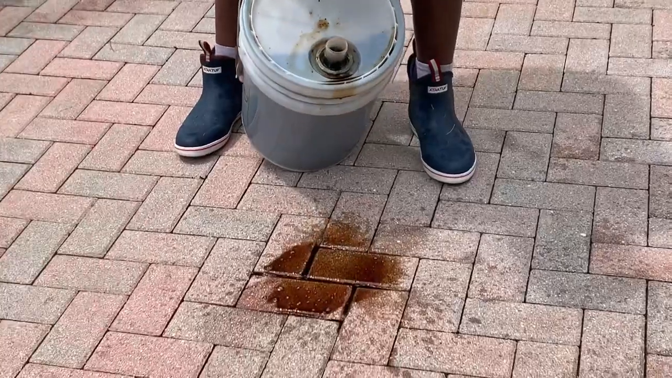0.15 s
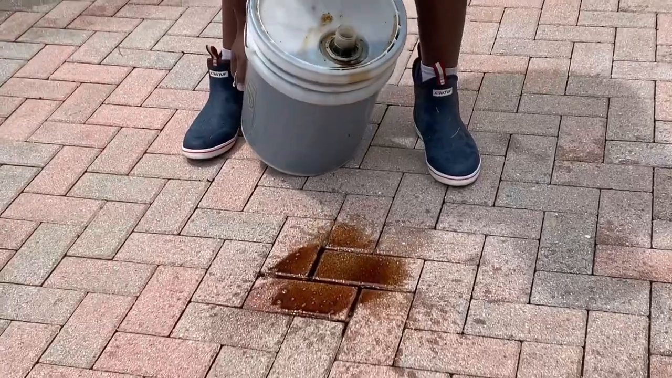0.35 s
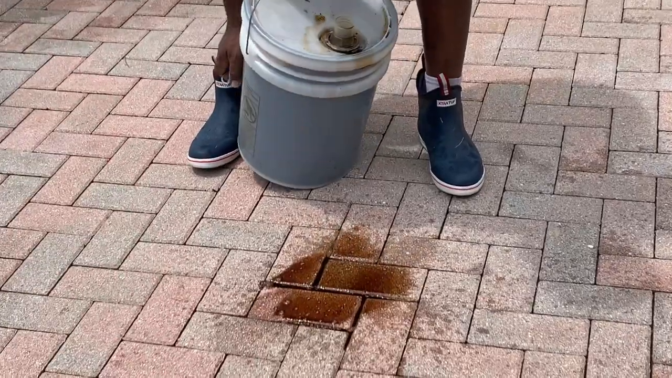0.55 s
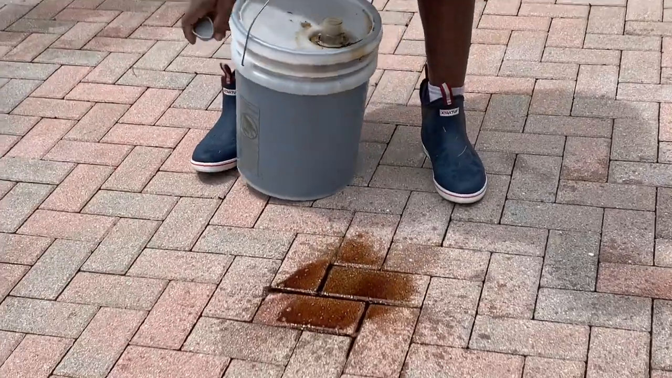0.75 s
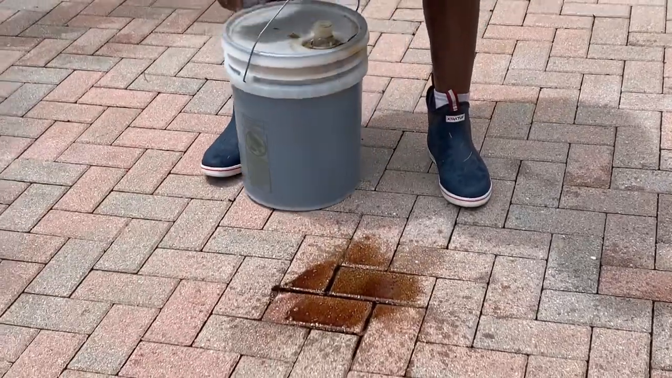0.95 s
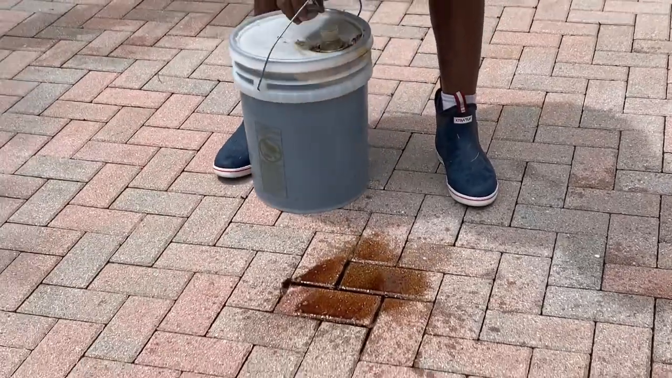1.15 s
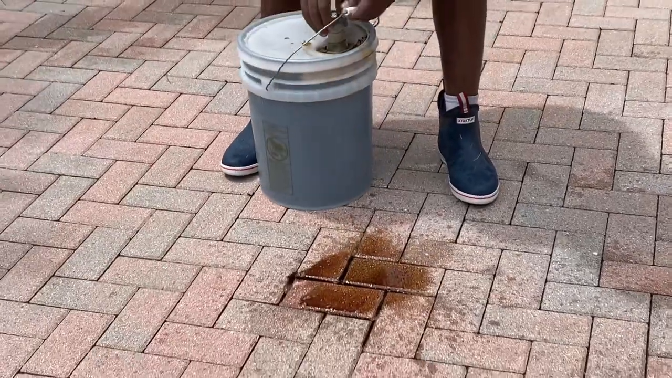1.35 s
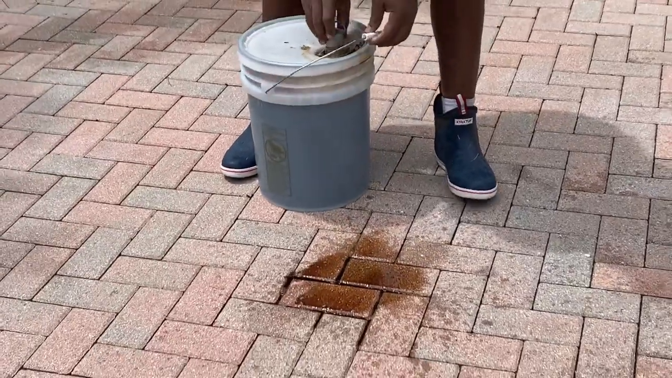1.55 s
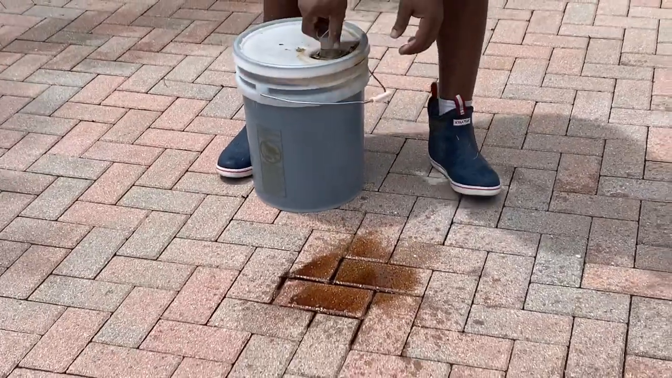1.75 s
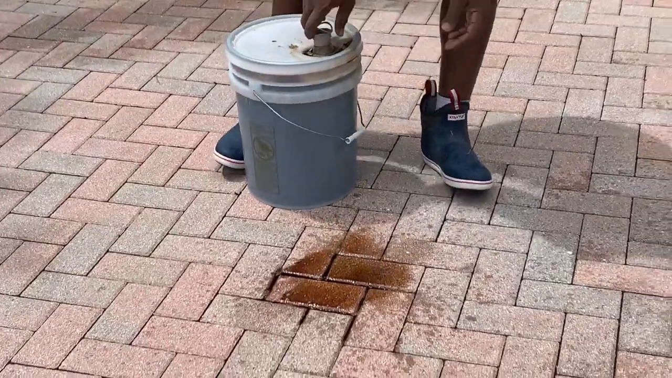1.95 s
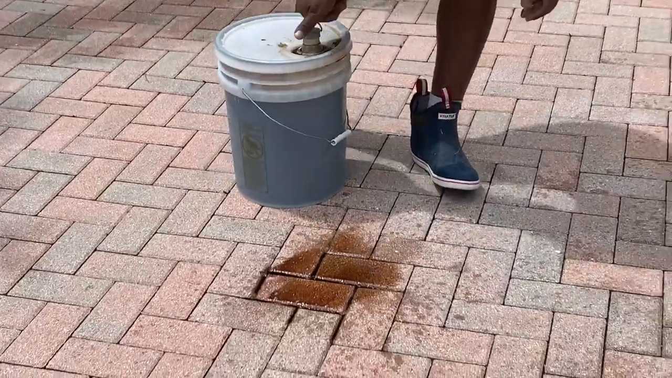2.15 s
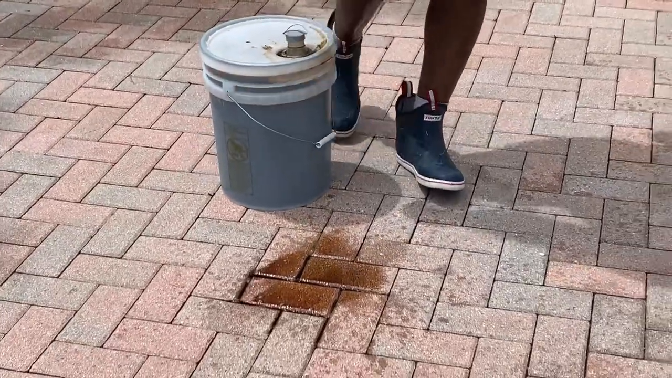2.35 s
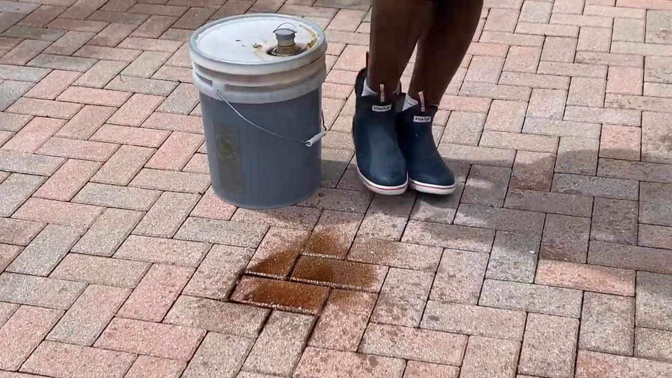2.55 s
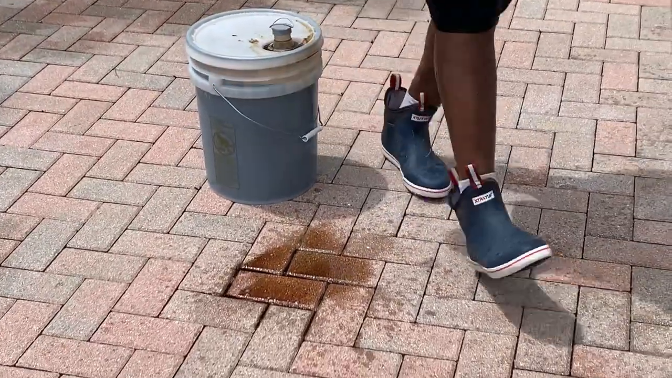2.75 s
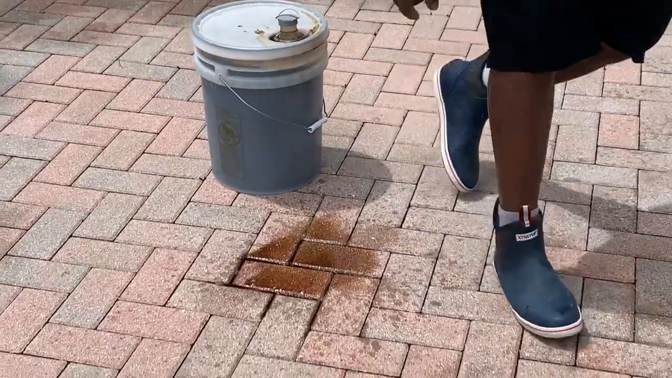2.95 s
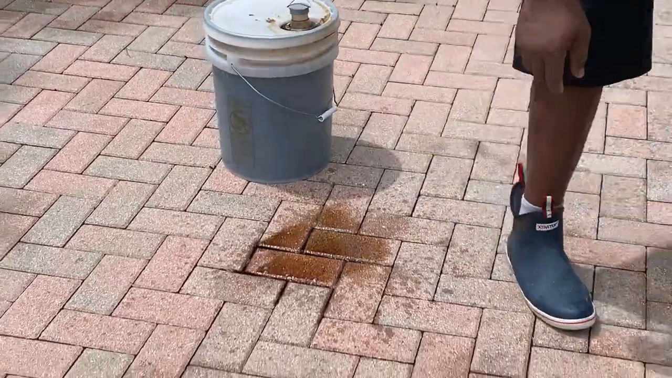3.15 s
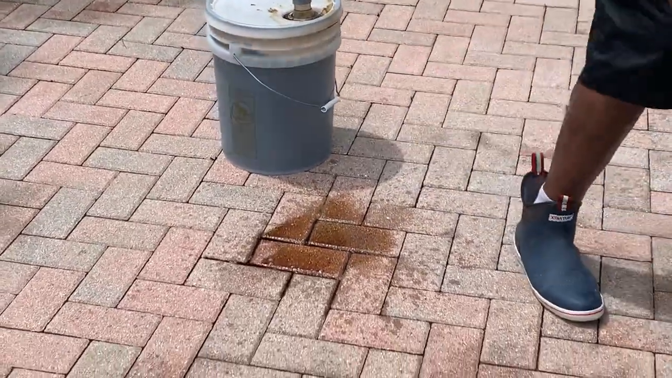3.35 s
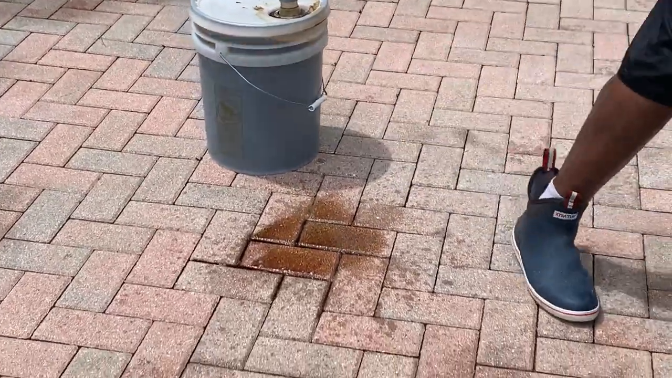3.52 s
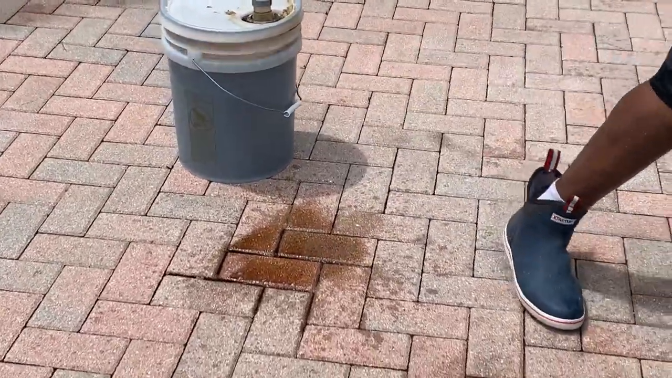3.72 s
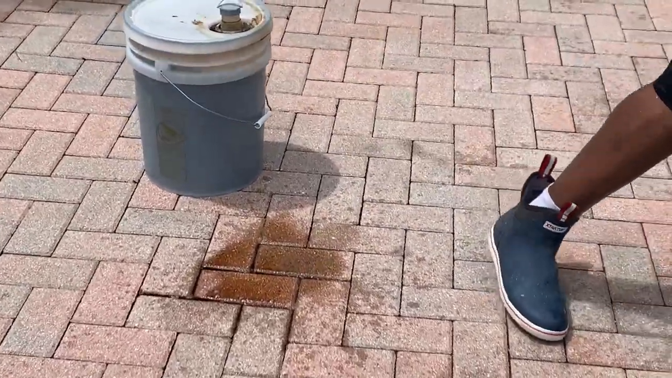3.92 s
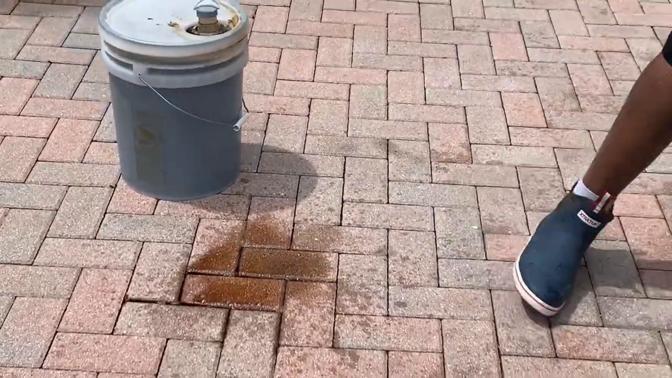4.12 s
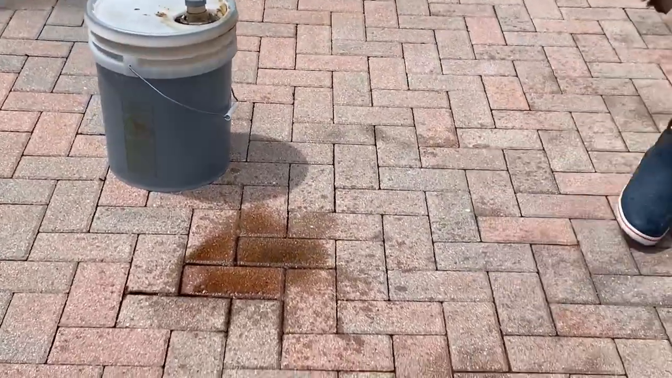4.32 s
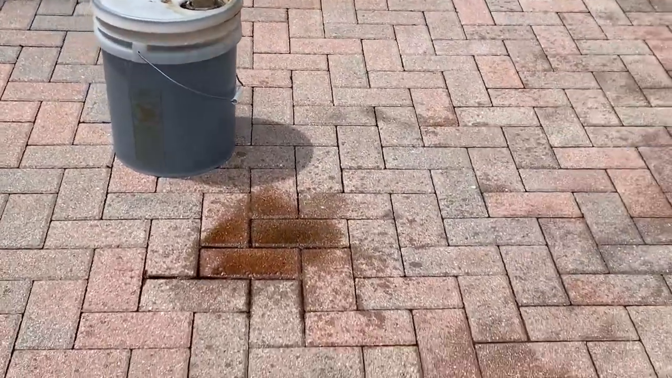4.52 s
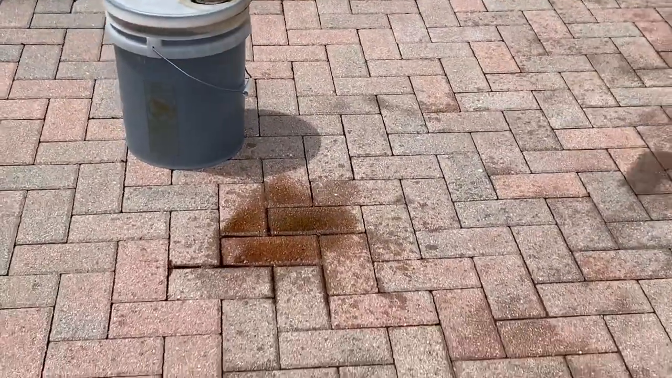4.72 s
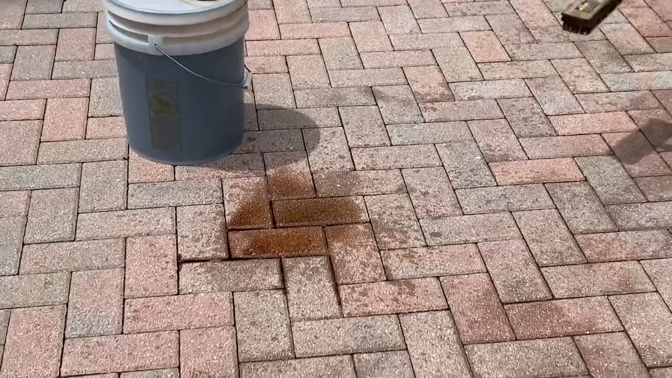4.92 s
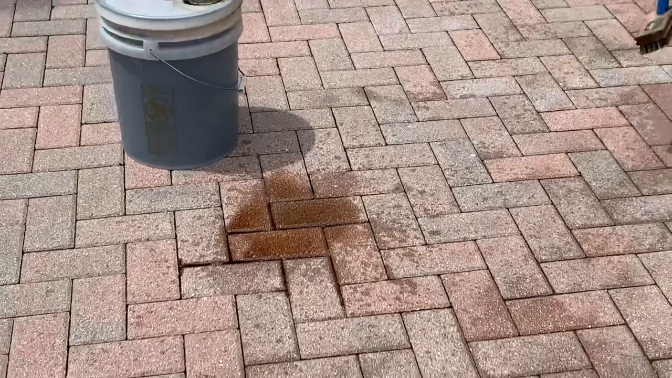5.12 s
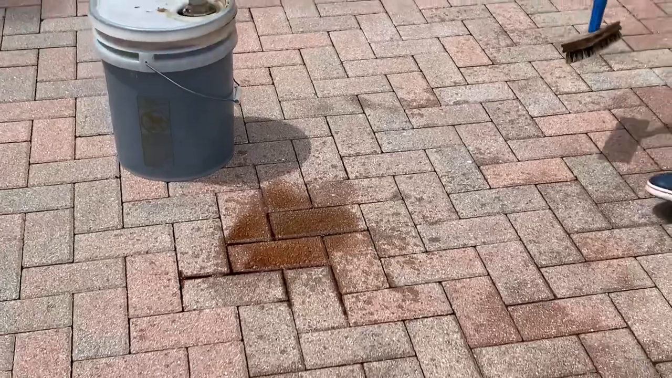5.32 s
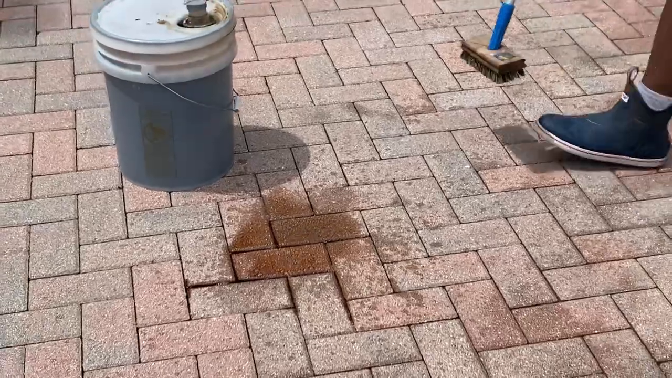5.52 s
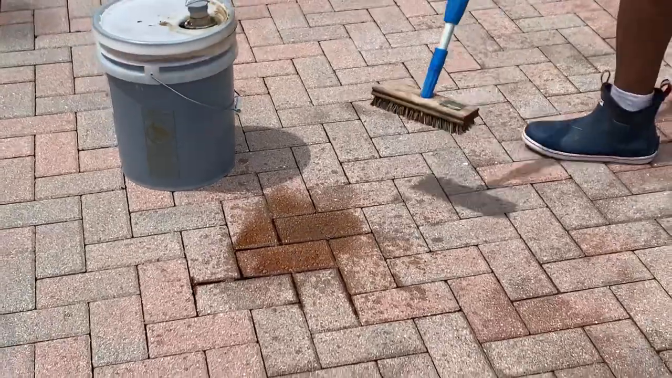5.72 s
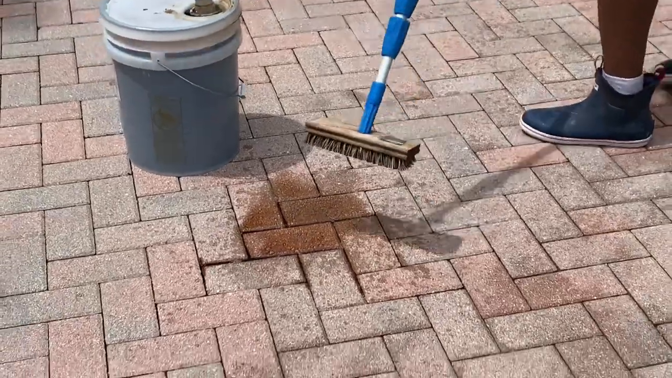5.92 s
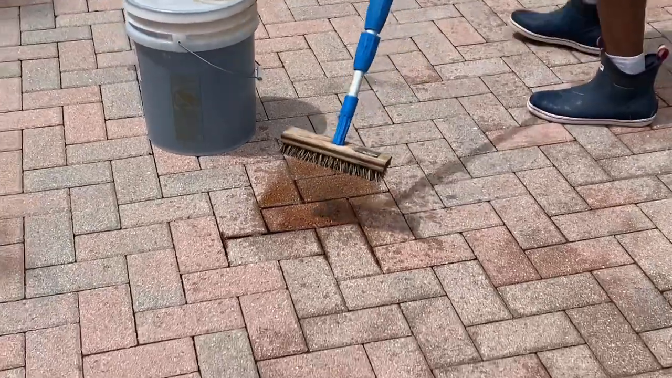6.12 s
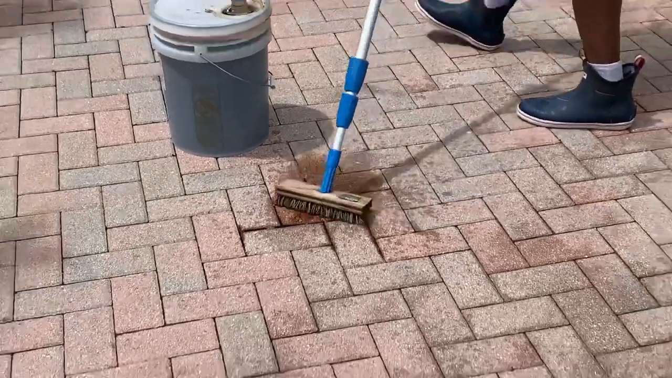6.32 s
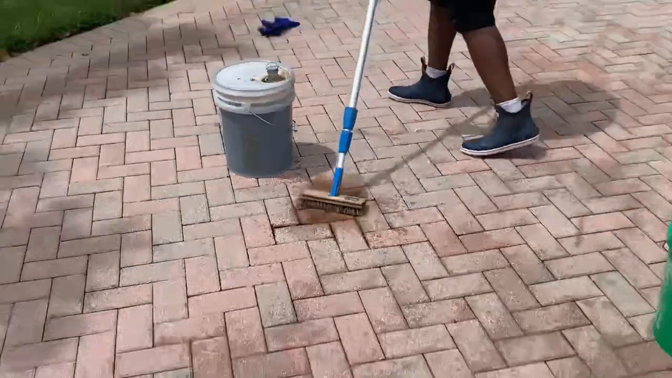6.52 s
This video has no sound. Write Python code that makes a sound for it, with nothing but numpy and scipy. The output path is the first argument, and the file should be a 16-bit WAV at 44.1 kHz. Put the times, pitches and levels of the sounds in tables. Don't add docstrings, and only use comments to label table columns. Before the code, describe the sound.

A full plastic pail thuds onto brick pavers, its wire handle clatters down, boots scuff away, then a stiff brush scrubs briefly outdoors.

```python
import sys
import numpy as np
from scipy import signal
from scipy.fft import rfft, irfft
from scipy.io import wavfile
from scipy.ndimage import uniform_filter1d

SR = 44100
rng = np.random.default_rng(int(sys.argv[2]) if len(sys.argv) > 2 else 0)


def invert_db(x):
    u = np.asarray(x, float) / 20
    return 10 ** u


def wav_record(signal):
    frames = np.transpose(np.atleast_2d(signal))
    bounded = np.clip(frames, -1, 1)
    quanta = np.round(bounded * 32767).astype(np.int16)
    wavfile.write(sys.argv[1], SR, quanta)


N = 294147
T = np.arange(N) / SR
HZ = np.fft.rfftfreq(N, 1 / SR)


def rms_one(x):
    return x / np.sqrt(np.mean(x ** 2) + 1e-20)


def in_time(rows):
    s, *columns = np.transpose(rows)
    return [np.interp(T, s, column) for column in columns]


def at_hz(points):
    hz, value = np.transpose(points)
    return np.interp(np.log(HZ + 1), np.log(hz), value)


def drift(rate_hz):
    steps = rng.standard_normal(int(N / SR * 60) + 9)
    memory = np.exp(-2 * np.pi * rate_hz / 60)
    slow = rms_one(signal.lfilter([1], [1, -memory], steps))
    return np.interp(T * 60, np.arange(len(steps)), slow)


def grains(per_s, spread_db):
    happens = rng.random(N) < per_s / SR
    sizes = invert_db(spread_db * np.minimum(rng.exponential(1, N), 4)) * happens
    return rms_one(sizes * rng.standard_normal((2, N)))


def swells(rows, rise):
    edge_db = 24.5
    coarse, rise = T[::32], np.clip(rise, .01, .9)
    s, length, *peaks = np.transpose(rows)[..., None]
    away = np.maximum((s - coarse) / rise, (coarse - s) / (1 - rise)) / length
    return np.array([np.interp(T, coarse, invert_db(2 * (peak_db - edge_db * away)).sum(axis=0)) for peak_db in peaks])


def resonate(x, peaks):
    out = 0
    for k, (hz, width_hz, level_db) in enumerate(peaks):
        r = np.exp(-np.pi * width_hz / SR)
        poles = [1, -2 * r * np.cos(2 * np.pi * hz / SR), r * r]
        out = out + (-1) ** k * invert_db(level_db) * signal.lfilter([1 - r, 0, r - 1], poles, x)
    return out


def patchy(pair, window, across, along, spread_db):
    _, _, cells = signal.stft(pair, nperseg=window)
    chance = rng.standard_normal(cells.shape[1:])
    patches = uniform_filter1d(uniform_filter1d(chance, size=across, axis=0), size=along, axis=1)
    return rms_one(signal.istft(cells * invert_db(spread_db * rms_one(patches)), nperseg=window)[1][:, :N])


# f/Hz, likeness (0 to 1)
FAR = [(100, 0.84), (400, 0.54), (900, 0.47), (1500, 0.3), (2100, 0.21), (3400, 0.33), (4200, 0.4),
       (5800, 0.22), (6400, 0.31), (7500, 0.79), (8300, 0.78), (16000, 1)]
# f/Hz, likeness (0 to 1)
NEAR = [(400, 0.83), (1300, 0.74), (2200, 0.26), (3400, 0.13), (4200, 0.79), (5500, 0.53), (6500, 0.84),
        (7500, 0.85), (8300, 0.91), (16000, .93)]


def colour(pair, spectrum, likeness):
    shared, own = rfft(pair) * invert_db(at_hz(spectrum))
    alike = np.clip(at_hz(likeness), 0, 1)
    shared, own = shared * np.sqrt(1 + alike), own * np.sqrt(1 - alike)
    return irfft(np.array([shared + own, shared - own]), N)


# f/Hz, level/dB per Hz
AIR = [(30, -14), (60, 5.5), (120, 1), (250, -5), (400, -14), (800, -16), (1400, -19), (2500, -25),
       (4000, -32), (6000, -36.5), (7800, -44.5), (8800, -33.5), (12000, -73), (16000, -65)]
# t/s, level/dB
AIR_LEVEL = [(0.0, -55), (1.88, -55), (2.53, -57), (5.78, -53.5), (6.09, -55.5), (6.67, -49)]


def air():
    hush = colour(rng.standard_normal((2, N)), AIR, FAR)
    return invert_db(11 + in_time(AIR_LEVEL)[0]) * patchy(hush, 512, 5, 24, 2.27)


# t/s, firing f/Hz, level/dB, extra path of the wall echo/m, boom of the exhaust pipe/dB
ENGINE = [(0.0, 52.87, -42.0, 2.65, -4), (0.83, 52.6, -41.5, 2.29, -5.5), (1.11, 52.34, -44.5, 2.8, 1),
          (1.28, 52.53, -46, 2.57, 0.5), (1.79, 52.48, -44, 2.64, -0.5), (1.88, 51.97, -44, 2.38, -3.5),
          (2.5, 52.1, -42, 2.33, -3), (2.88, 52.65, -44, 2.42, 5), (3.08, 53.1, -46.5, 3.04, 4),
          (3.7, 53.38, -45.5, 2.5, 4), (3.98, 53.32, -45, 2.62, -1.5), (4.5, 53.18, -40, 2.78, -7.5),
          (4.63, 53.52, -38.5, 2.45, -2), (5.02, 53.56, -38.5, 2.56, -8), (5.59, 53.36, -46, 2.5, 0.1),
          (5.78, 52.94, -54.5, 2.9, 2.5), (6.16, 52.26, -46, 2.9, 0.3), (6.64, 52.28, -51.5, 3.46, -1)]
# multiple of firing rate, level/dB, share of the boom
STRONG = [(2, 0.13, -0.12), (3, -8.5, -0.18), (4, -6.5, 1.17), (5, -19.5, -0.042), (6, -12.5, -0.14),
          (6.5, -22.5, -.6)]
# multiple of firing rate, level/dB
UNEVEN = [(1.5, -62), (2.5, -52.5), (3.5, -55.5), (4.5, -62.5), (5.5, -64.5), (7, -71.5), (8, -75)]


def engine():
    echo, sound_m_per_s = 1.094, 346.5
    hz, level, echo_m, boom_db = in_time(ENGINE)
    turn = 2 * np.pi * np.cumsum(hz) / SR
    late = 2 * np.pi * hz * uniform_filter1d(echo_m, size=4000) / sound_m_per_s
    lines = []
    for k, db, share in STRONG:
        comb_db = 10 * np.log10(1 + echo ** 2 + 2 * echo * np.cos(k * late) + 1e-9)
        lines.append((k, level + db + share * boom_db + comb_db))
    lines += [(k, level_db + 4.2 * drift(0.45)) for k, level_db in UNEVEN]
    out = 0
    for k, level_db in lines:
        phase = k * turn + rng.uniform(0, 2 * np.pi) + 0.035 * drift(10.0)
        line = np.sqrt(2) * invert_db(level_db + 0.57 * drift(2.3)) * np.exp(1j * phase)
        out = out + np.cos(0.038 * k) * line.imag + np.sin(0.039 * k) * line.real * [[1], [-1]]
    return out


# f/Hz, level/dB per Hz
WIND_COLOUR = [(25, -65), (40, 2), (62, 9.5), (90, 11), (140, 5.5), (220, -17), (350, -13), (600, -48.5)]
# t/s, level/dB
BREEZE = [(0.0, -59), (2.3, -64), (2.8, -59), (3.9, -44.5), (5.3, -38.5), (6.67, -41)]
# t/s, length/s, peak level/dB
GUSTS = [(.12, .3, -45), (.34, .4, -50), (1.06, .2, -32.5), (1.4, 0.25, -43), (1.84, 0.45, -41),
         (2.25, 0.2, -39.5), (3.05, 0.28, -36), (3.35, 0.32, -37.5), (3.6, .3, -42), (3.78, 0.4, -36.5),
         (4.53, 0.41, -40), (4.68, 0.43, -31.5), (4.95, 0.42, -39), (5.2, 0.45, -33), (5.54, 0.28, -32),
         (6.16, .3, -33.5), (6.43, 0.34, -41)]


def wind():
    noise = invert_db(7.7 * drift(22)) * rng.standard_normal((2, N))
    lumps = colour(noise, WIND_COLOUR, [(50, 0.75), (300, 0.86)])
    strength = np.sqrt(uniform_filter1d(np.mean(lumps ** 2, axis=0), size=4000) + 1e-20)
    power = invert_db(2 * in_time(BREEZE)[0]) + swells(GUSTS, 0.49)[0]
    return np.sqrt(power) * lumps / strength


# t/s, peak level/dB
KNOCKS = [
    (0.215, -30.5),
    (3.313, -34),
    (3.392, -45),
    (3.4, -42),
    (3.556, -41),
    (3.62, -48.5),
    (5.418, -37.5),
    (6.032, -36.5),
    (6.071, -31),
    (6.134, -29),
]


def knocks():
    after = np.arange(3000) / SR
    hz = 55 + 1100 / (1 + after / 0.00178) ** 1.6
    fade = (1 - np.exp(-after / 0.0021)) * invert_db(-60 * after / 0.053)
    sweep = np.sin(2 * np.pi * np.cumsum(hz) / SR) * fade
    out = np.zeros((2, N))
    for s, peak_db in KNOCKS:
        at = round(s * SR)
        out[:, at:at + 3000] += invert_db(peak_db + 9.0) * sweep * invert_db([[1.5], [-1.5]])
    return out


# f/Hz, level/dB per Hz
GRIND = [(400, -3), (800, -4), (2200, 2.5), (4000, -7), (6000, -8.5), (8000, -16.5)]
# f/Hz, level/dB per Hz
HISS = [(4000, -19), (6500, -1), (7800, -6.5), (8800, 4), (11000, -1.5), (14000, -5), (16000, 3.5)]
# f/Hz, level/dB per Hz
SLIDE = [(2500, 2), (4500, 1.5), (7800, -6), (8800, -1), (11000, -7.5), (12500, -9), (13500, -22),
         (16000, -28)]
# t/s, length/s, grinding level/dB, hiss level/dB
RUBS = [(.72, 0.14, -60.5, -58), (.802, 0.16, -53.5, -53.5), (1.3, 2.8, -67, -85), (1.6, 0.26, -76, -72),
        (2.08, 1.26, -63.5, -60.5), (2.52, 0.27, -63, -55), (2.93, 0.57, -62.5, -59),
        (3.55, 0.68, -75, -66), (3.84, 0.28, -66, -60), (4.15, 0.26, -64, -58.5), (4.55, 0.27, -58.5, -61),
        (5.47, 0.16, -80, -64), (5.645, 0.46, -50.5, -52), (5.77, 0.28, -53.5, -59), (6.23, .2, -58, -73)]
# t/s, length/s, grinding level/dB, hiss level/dB
SCRAPES = [(.39, 0.7, -61.5, -79), (.994, 0.02, -55, -41), (1.004, .08, -55, -48.5),
           (1.04, 0.45, -60, -62.5), (1.722, 0.086, -58.5, -60.5), (1.82, 0.089, -37.5, -43),
           (3.38, 0.17, -78, -58), (4.425, .6, -69, -60.5), (5.056, 0.034, -49, -62), (5.07, .25, -73, -66),
           (5.518, 0.4, -60, -48), (5.985, 0.11, -72, -57), (6.283, 0.02, -51, -40)]


def scuffs():
    at_rest = invert_db([[2 * -69], [2 * -80]])
    grind_db, hiss_db = 10 * np.log10(swells(RUBS, 0.53) + swells(SCRAPES, 0.056) + at_rest)
    grind = rms_one(colour(grains(5000, 0.68), GRIND, FAR)) * invert_db(grind_db + 6.5)
    fine = grains(9000, 0.54)
    dragged = (T > 5.51) & (T < 5.75)
    hiss = np.where(dragged, rms_one(colour(fine, SLIDE, NEAR)), rms_one(colour(fine, HISS, NEAR)))
    return (grind + hiss * invert_db(hiss_db + 7.0)) * np.clip((6.3 - T) / 0.021, 0, 1)


# t/s, length/s, level/dB, start f/Hz, end f/Hz
SQUEAKS = [
    (.702, 0.028, -50.5, 1300, 1050),
    (.696, 0.04, -52.5, 3300, 3200),
    (1.042, .03, -49.5, 1020, 1230),
    (.78, .039, -49, 2700, 4200),
    (3.65, .009, -48, 2400, 2180),
    (4.112, 0.0358, -50, 1465, 1400),
    (4.139, .058, -50.5, 2400, 1600),
    (6.195, 0.054, -51, 950, 1300),
    (5.58, .15, -51, 2400, 2600),
    (1.045, .05, -55, 800, 600),
]
# t/s, length/s, level/dB, start f/Hz, end f/Hz
CHIRPS = [
    (5.075, .06, -66, 9000, 9050),
    (5.175, 0.04, -54.5, 9180, 9240),
    (5.347, 0.03606, -56, 9800, 10000),
]


def squeaks():
    out = np.zeros((2, N))
    events = [(*row, 0.36) for row in SQUEAKS] + [(*row, 0.024) for row in CHIRPS]
    for s, length, level_db, start_hz, end_hz, width in events:
        part = np.linspace(0, 1, round(length * SR))
        lowpass = signal.butter(2, width * start_hz / SR)
        rough = rms_one(signal.lfilter(*lowpass, rng.standard_normal((2, 12000)))[:, -len(part):])
        glide = np.cos(2 * np.pi * np.cumsum(start_hz + (end_hz - start_hz) * part) / SR)
        swell = invert_db(level_db) * np.sqrt(np.sin(np.pi * part))
        out[:, round(s * SR):][:, :len(part)] += swell * glide * rough * [[1], [.5]]
    return np.array([out[0] + out[1], out[0] - out[1]])


# t/s, peak level/dB, f/Hz, t60/s
THUMPS = [(0.999, -25, 194.6, 0.23), (1.0015, -23, 97, .2), (1.0118, -22, 96, 0.17),
          (1.044, -34.5, 286, 0.15), (1.078, -37.5, 288, 0.14), (1.087, -24, 107, .12), (1.05, -28, 71, .2),
          (.995, -46, 1030, .08), (1.012, -47, 980, .07), (.995, -35.5, 381, 0.11), (0.92, -39, 600, 0.1),
          (1.545, -53.5, 1250, 0.043), (4.2, -48, 480, 0.048), (2.06, -36.5, 210, 0.39),
          (3.501, -33, 553, 0.041), (1.82, -40, 294.1, 0.29), (1.9, -31.5, 191, 0.33),
          (2.149, -32, 243.8, 0.22), (4.649, -25.5, 59, 0.67), (5.436, -19.5, 66.5, 0.28),
          (5.508, -16.5, 67.7, 0.19), (5.515, -20, 163.6, 0.12)]


def thumps():
    out = np.zeros(N)
    after = T[:SR // 2]
    for s, peak_db, hz, t60 in THUMPS:
        envelope = invert_db(peak_db - 60 * after / t60) * (1 - np.exp(-after / 0.0043))
        out[round(s * SR):][:len(after)] += envelope * np.sin(2 * np.pi * hz * after)
    return out


# f/Hz, width/Hz, level/dB
PAIL = [(1144, 195, 11), (2020, 140, 9), (3500, 1000, -11), (5100, 800, -13)]
# f/Hz, width/Hz, level/dB
WIRE = [(6500, 850, -21), (8750, 240, 9), (12470, 1300, 0), (15200, 1200, -12)]
# f/Hz, width/Hz, level/dB
SOLE = [(663, 81, 12.5), (2400, 2700, -4.5)]
# f/Hz, width/Hz, level/dB
GRIT = [(1100, 330, 1.5), (2470, 900, 2.5)]
# f/Hz, width/Hz, level/dB
BLOCK = [(1500, 127, 7), (5300, 320, 7), (7025, 510, 5.5)]
# t/s, dull level/dB, bright level/dB, ring f/Hz
PAIL_HITS = [
    (.9951, -41, -34.5, 3570),
    (1.0166, -41, -34.5, 3870),
    (1.8112, -31, -30.5, 5000),
    (1.8168, -29, -31, 4370),
    (1.8254, -26.5, -27, 2140),
    (1.8344, -33.5, -26.5, 4050),
    (1.8413, -48, -34.5, 3960),
    (1.8658, -42, -37, 5270),
    (1.8919, -49, -45, 4000),
]
# t/s, dull level/dB, bright level/dB, ring f/Hz
PAIL_TAPS = [
    (1.048, -51, -70, 1031),
    (1.1618, -48, -69, 1890),
    (1.365, -42.5, -62, 800),
    (1.549, -49, -75, 1290),
    (1.722, -58, -50.5, 1980),
    (1.7856, -43, -64.5, 2700),
    (1.95, -53, -52, 4000),
    (1.9716, -44.5, -68, 3980),
    (2.0591, -42.5, -44.5, 2645),
]
# t/s, dull level/dB, bright level/dB, ring f/Hz
SNAP = [
    (1.8197, -36, -12.5, 1100),
]
# t/s, dull level/dB, bright level/dB, ring f/Hz
SOLE_HITS = [(.4647, -47, -76, 2130), (.4913, -45, -73, 2150), (.7701, -62, -55, 4570),
             (.7871, -39, -51, 3650), (2.4637, -44.5, -69.5, 1000), (3.5986, -59, -54, 4820),
             (3.7738, -48, -75, 1639), (3.819, -62, -60, 4216), (4.0137, -42.5, -70, 1500),
             (4.552, -39.5, -50, 3680), (5.4209, -41.5, -50.5, 3360), (5.5141, -43, -59, 4133),
             (6.0184, -52, -55, 4475)]
# t/s, dull level/dB, bright level/dB, ring f/Hz
GRIT_HITS = [(3.1, -47, -70, 2250), (3.421, -49, -70, 801.5), (3.785, -48, -70, 2250),
             (3.5036, -40, -58, 1899), (4.12, -48, -57.5, 1551), (4.146, -46, -62, 2200),
             (4.18, -49, -66, 2000), (4.503, -56, -62, 6500), (4.53, -52, -66, 3003),
             (5.0563, -38.5, -50, 2190), (6.425, -41.5, -48, 3502)]
# t/s, dull level/dB, bright level/dB, ring f/Hz
LANDING = [
    (6.2785, -29.5, -51, 2800),
]


def ticks():
    contacts = [(PAIL_HITS, PAIL, 0.022), (PAIL_TAPS, PAIL, 0.045), (SNAP, PAIL, .005),
                (SOLE_HITS, SOLE, 0.046), (GRIT_HITS, GRIT, 0.032), (LANDING, BLOCK, 0.023)]
    out = np.zeros((2, N))
    after = np.arange(4096) / SR
    click = 1.9 * (after == 0) * [[1], [0]]
    for rows, body, t60 in contacts:
        for s, dull_db, bright_db, hz in rows:
            noise = rng.standard_normal((2, 4096))
            burst = (noise + click) * invert_db(-60 * after / t60) + 1e-18
            dull = invert_db(5.0) * resonate(burst, body) + resonate(burst, [(hz, 0.32 * hz, 9.0)])
            bright = invert_db(bright_db + 10.0) * resonate(burst, WIRE)
            out[:, round(s * SR):][:, :4096] += invert_db(dull_db) * dull + bright
    return colour(out, [(20, 0.002), (20000, 0.017)], NEAR) / np.sqrt(2)


# f/Hz, level/dB, t60/s
RINGS = [(703, -14, .04), (1113, -12, .04), (1320, -11, .035), (1660, -17, .03), (1992, -15, .03),
         (2225, -10, 0.045), (2700, -13, 0.035), (3840, -9, 0.028), (5200, -13, .02), (6573, -13.5, .025),
         (9200, -12, .025), (10800, -12, 0.028), (11950, -1.5, 0.036), (14500, -5, .03)]
# t/s, dull modes level/dB, bright modes level/dB
BLOWS = [(0.995, -42, -40), (1.0166, -41, -37), (1.8112, -33, -35), (1.8135, -33, -38), (1.8168, -31, -34),
         (1.8197, -28, -22.5), (1.8226, -29.5, -36), (1.8252, -32, -29), (1.8344, -32, -27),
         (1.8413, -37, -36), (1.846, -33, -42), (1.8658, -38.5, -35), (1.871, -40, -46), (1.8919, -43, -44)]


def rings():
    split = 0.0456
    s, dull_db, bright_db = np.transpose(BLOWS)
    modes = [(hz * (1 + split * side), level_db - 4.5 - 3.2 * abs(side), t60)
             for hz, level_db, t60 in RINGS for side in (-1.2, 0, 1)]
    luck = rng.standard_normal((len(s), len(modes)))
    out = np.zeros(N)
    for (hz, level_db, t60), chance in zip(modes, luck.T):
        blow_db = np.where(hz < 8000, dull_db, bright_db)
        clicks = np.zeros(2 * SR) + 1e-18
        clicks[(s * SR).astype(int)] = invert_db(level_db + blow_db + 3.4 * chance) * np.sign(chance)
        r, w = invert_db(-60 / (t60 * SR)), 2 * np.pi * hz / SR
        out[:2 * SR] += signal.lfilter([0, np.sin(w)], [1, -2 * r * np.cos(w), r * r], clicks)
    return out * np.ones((2, 1))


# f/Hz, level/dB per Hz
BRISTLES = [(500, -16), (1500, -15.5), (3000, -9.5), (5500, -10), (7000, -9), (7800, -9.5), (8800, -3.5),
            (11500, -1), (14500, 1.5), (16000, -5)]
# start t/s, end t/s, tips level/dB, body level/dB
STROKES = [
    (6.277, 6.3, -35, -33),
    (6.312, 6.339, -31, -32.5),
    (6.436, 6.481, -28.5, -31),
    (6.562, 6.613, -28, -27),
]


def brush():
    push_db_per_s, lift_db_per_s = 560, 650
    settle_db, settle_db_per_s = -13, 110
    inset = np.array([[0], [0.0083]])
    landed = T > STROKES[0][0]
    power = invert_db([[2 * -53], [2 * -49]]) * landed
    for start, end, *peak_db in STROKES:
        before = np.maximum(start + inset - T, 0)
        after = np.maximum(T - end + inset, 0)
        held = invert_db(-2 * push_db_per_s * before - 2 * lift_db_per_s * after)
        settling = invert_db(2 * settle_db - 2 * settle_db_per_s * after) * (T > end)
        power = power + invert_db(2 * np.array(peak_db))[:, None] * (held + settling) * landed
    catch = invert_db([[0.8], [1.6]] * np.interp(T * 160, np.arange(1200), rng.standard_normal(1200)))
    flicks = rfft(patchy(colour(grains(14000, 1.5), BRISTLES, NEAR), 256, 3, 7, 2.5))
    tips, body = irfft(flicks * (HZ > 8200), N), irfft(flicks * (HZ <= 8200), N)
    gain = np.sqrt(power) * catch
    return gain[0] * tips + gain[1] * body


# f/Hz, lead of left/half turns
PORTS = [(0, 0), (700, 0), (1300, .5), (2500, 1), (3150, 1.5), (4100, 2), (5550, 2.5), (6400, 2),
         (8450, 1.5), (11000, 1), (13450, .5), (15750, 0), (22050, -1.3)]
# f/Hz, lead of left/half turns
AHEAD = [(0, 0), (4500, .08), (5300, .3), (6200, 0), (7500, -.2), (8450, -.5), (11000, -1), (13450, -1.5),
         (15750, -2), (22050, -3.3)]


def ports(pair, table):
    hz, turns = np.transpose(table)
    turn = np.exp(1j * np.pi * np.interp(HZ, hz, turns))
    top = np.clip((16000 - HZ) / 250, 0, 1)
    return irfft(rfft(pair) * np.array([turn, np.conj(turn)]) * top, N)


def scene():
    around = air() + engine() + wind() + knocks() + scuffs() + thumps() + brush()
    return ports(around, PORTS) + ports(squeaks() + ticks() + rings(), AHEAD)


def roll_off(x):
    return signal.sosfilt(signal.butter(12, 16860, fs=SR, output="sos"), x)


def record(dry):
    return roll_off(dry)


dry = scene()
out = record(dry)
wav_record(out)
```